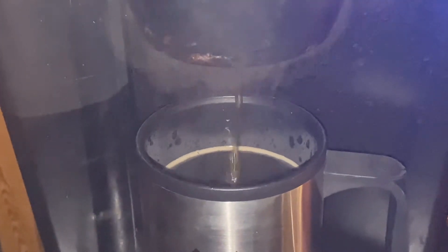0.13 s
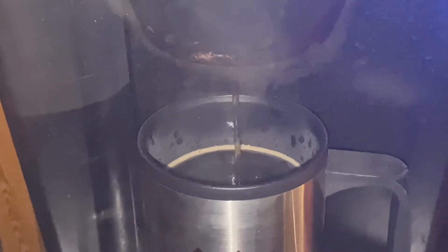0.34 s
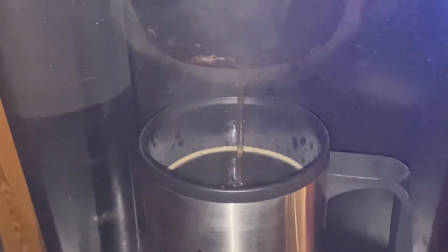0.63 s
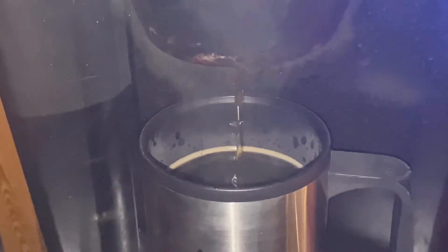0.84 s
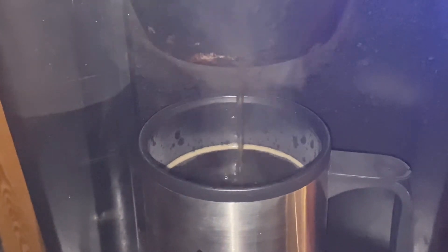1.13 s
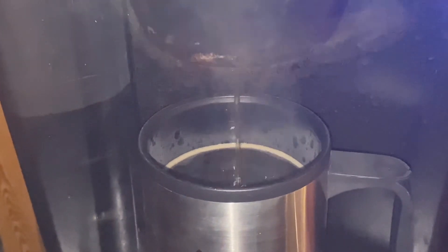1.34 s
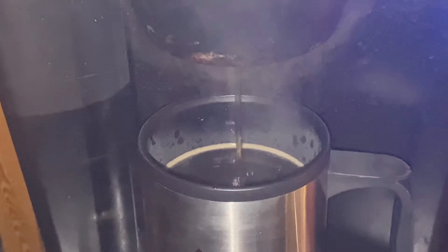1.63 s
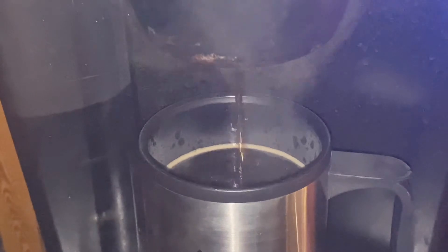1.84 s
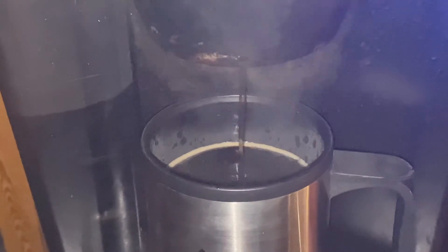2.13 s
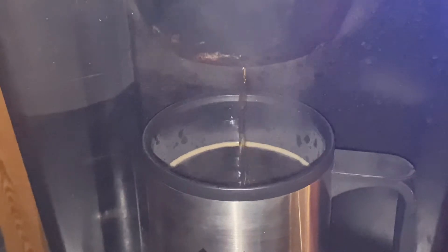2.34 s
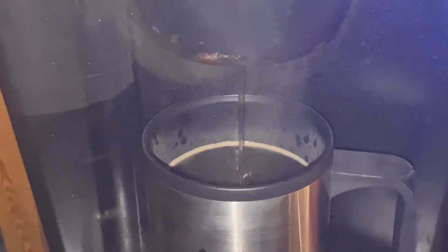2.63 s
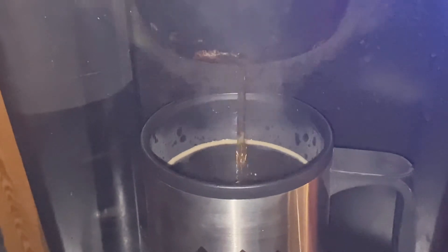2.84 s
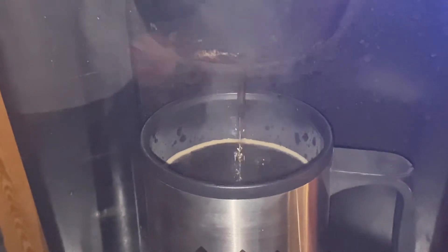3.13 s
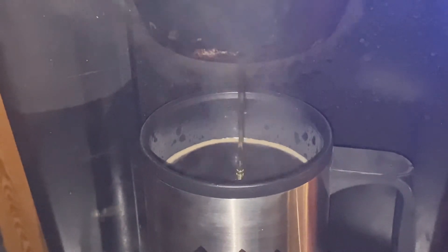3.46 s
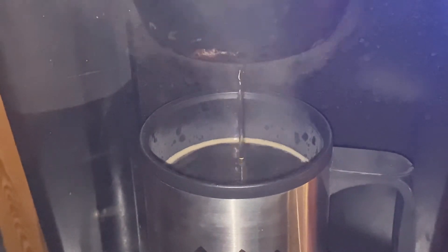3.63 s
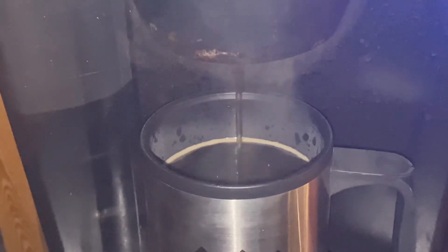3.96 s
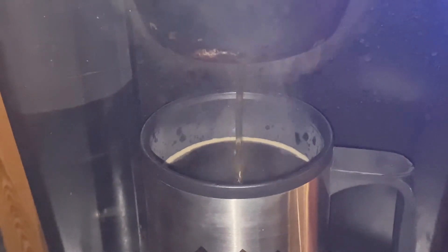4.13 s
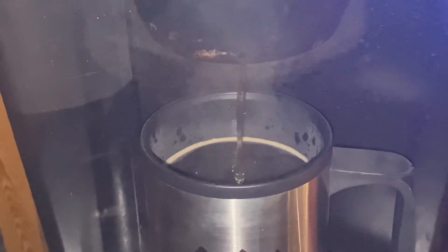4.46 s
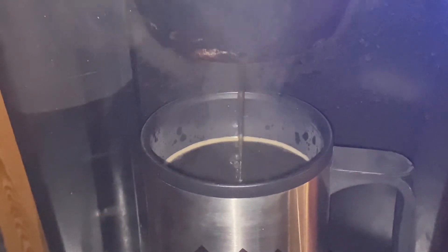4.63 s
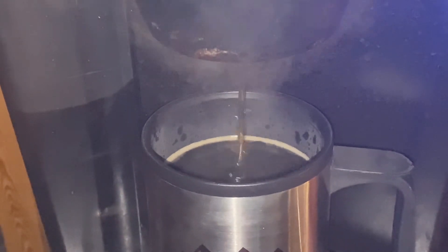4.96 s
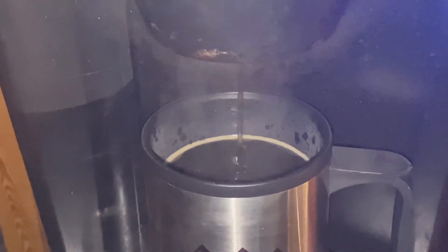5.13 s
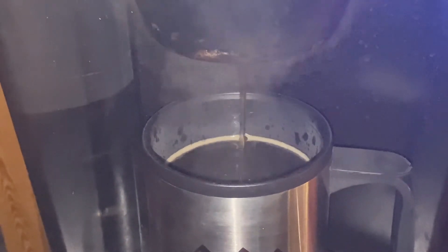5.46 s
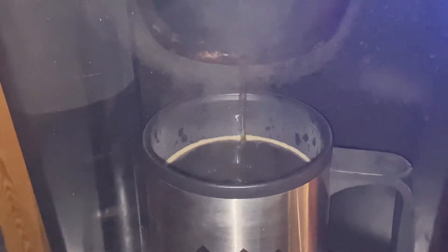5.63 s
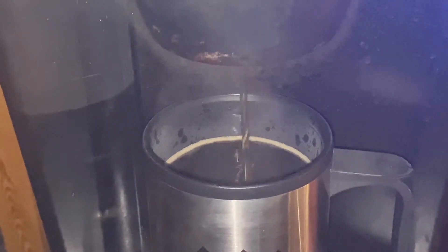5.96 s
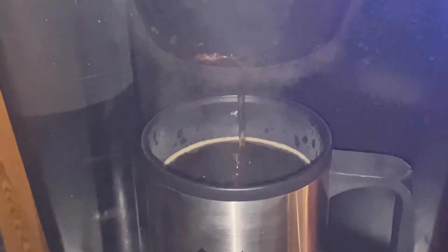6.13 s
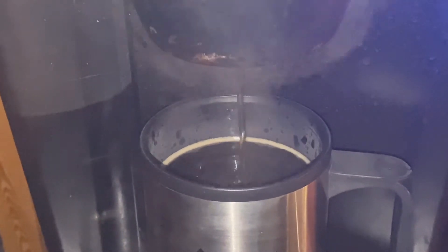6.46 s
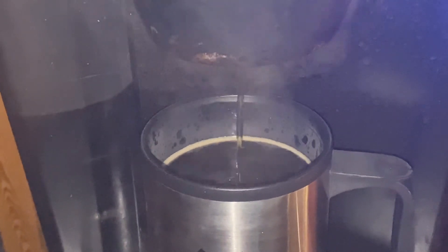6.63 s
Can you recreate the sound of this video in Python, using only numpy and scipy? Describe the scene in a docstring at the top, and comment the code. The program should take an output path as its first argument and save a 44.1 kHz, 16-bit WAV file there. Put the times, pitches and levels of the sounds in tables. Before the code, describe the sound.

Close-up coffee maker trickle: irregular bubbly drips ring inside a metal mug while a pump hums in five short bursts above a low room drone.

```python
"""Coffee trickles from a brewer into a steel mug standing in its alcove, over a low room rumble.
From the start falling drops tick on the surface and trap bubbles, which sound as damped sines;
they drive the air of mug and alcove, a bank of resonances strongest near 1 kHz.
About half a second in, the pump starts the first of five bursts: shaft orders and a whirr, with clunks.
Two close microphone ports hear it with different phase and level."""
import sys
import numpy as np
from scipy import signal
from scipy.fft import rfft, irfft, next_fast_len
from scipy.io import wavfile
from scipy.ndimage import uniform_filter1d, map_coordinates

SR = 44100
rng = np.random.default_rng(int(sys.argv[2]) if len(sys.argv) > 2 else 0)


def unload_wav(signal):
    """Save mono or channel-first audio to the path in sys.argv[1] as 16-bit WAV at rate SR, clipped to [-1, 1]."""
    wavfile.write(
        sys.argv[1],
        SR,
        np.round(np.clip(np.atleast_2d(signal).T, -1, 1) * 32767).astype(np.int16),
    )


N = 299880

# room rumble: pitch_hz, relative density_db (per Hz)
RUMBLE_SPECTRUM = [(25, -25.5), (45, -2), (57, -6), (72, 5.5), (86, -9), (100, 1), (122, -14), (180, -14.5),
                   (310, -24.5), (900, -38), (2000, -81)]
# air resonances of the mug: pitch_hz (sways by HOLLOW_SWAY), width_hz, relative level_db
HOLLOW_MODES = [(951.7, 53.4, 8.5), (1029.7, 19.2, 8), (1122.5, 29.4, 8.5), (1322, 72, 2.5)]
# air resonances of the alcove: pitch_hz, width_hz, relative level_db
ALCOVE_MODES = [(1700, 630, -8.5), (2340, 129, 3), (2650, 210, 0), (3540, 276, 5.5), (5333, 238, -2),
                (6076, 225, 5.5), (8090, 252, 2), (8570, 240, 5.5), (9760, 130, -0.5), (10240, 100, 3.5),
                (10930, 470, 5), (11940, 270, 9.5), (14160, 2100, 4.5)]
# plinks of falling drops, one main pitch each: start_s, relative level_db, pitch_hz
PLINKS = [(0.002, -38, 1050), (0.01, -35, 1430), (0.056, -44.5, 3240), (0.249, -49, 3300),
          (0.293, -48.5, 3300), (0.386, -36.5, 6460), (0.337, -46, 1120), (0.47, -40.5, 1155),
          (0.738, -44, 1110), (0.792, -40, 954), (0.893, -42, 2250), (0.923, -38.5, 3200),
          (0.924, -44, 5130), (0.962, -38.5, 2840), (0.996, -42, 1156), (1.065, -40, 947),
          (1.215, -41.5, 3100), (1.237, -33, 1970), (1.268, -46, 3400), (1.362, -37, 1400),
          (1.412, -45, 1030), (1.69, -44.5, 1650), (1.87, -48, 1170), (1.931, -41.5, 1110),
          (2.273, -47.5, 1080), (2.338, -42, 745), (2.404, -43.5, 677), (2.475, -43, 970),
          (2.506, -45.5, 8100), (2.562, -44.5, 980), (2.626, -45.5, 970), (2.709, -44.5, 930),
          (2.751, -46, 1070), (2.807, -47, 2650), (2.87, -45.5, 3480), (2.899, -42.5, 3970),
          (3.115, -38, 2460), (3.329, -43, 2710), (3.454, -42.5, 1760), (3.491, -40.5, 960),
          (3.671, -40, 3170), (3.791, -40.5, 5860), (3.852, -40, 11200), (4.095, -39, 2800),
          (4.111, -40, 1740), (4.112, -43.5, 14700), (4.228, -39, 1450), (4.291, -39, 1600),
          (4.304, -38.5, 2090), (4.328, -45.5, 3540), (4.35, -38.5, 994), (4.381, -40, 1760),
          (4.393, -41, 3480), (4.432, -37, 3170), (4.662, -48, 2600), (4.822, -44, 980), (4.87, -26, 10300),
          (4.895, -39.5, 970), (4.917, -39, 1740), (4.936, -43.5, 3680), (4.954, -37, 1700),
          (4.983, -46, 990), (4.983, -38, 11600), (5.003, -43, 1040), (5.003, -37.5, 15500),
          (5.025, -45.5, 3520), (5.041, -46, 2970), (5.074, -46, 2690), (5.117, -46, 2660),
          (5.042, -47.5, 960), (5.072, -44.5, 990), (5.139, -46.5, 3550), (5.242, -40, 1140),
          (5.318, -43.5, 5900), (5.325, -49.5, 990), (5.442, -46, 2720), (5.455, -48, 2670),
          (5.463, -38.5, 4160), (5.528, -42.5, 3210), (5.813, -38, 3330), (5.953, -47.5, 1040),
          (6.03, -40, 1640), (6.04, -34.5, 1640), (6.086, -45, 3420), (6.165, -41.5, 2140),
          (6.202, -44, 2610), (6.212, -43, 2630), (6.402, -42, 960), (6.534, -41, 10700),
          (6.592, -42.5, 3470)]
# drops with a plop, a snap and spray, each loud or faint, levels relative: start_s,
# plop_level_db, plop_pitch_hz, snap_level_db, snap_pitch_hz, spray_level_db
COMPOUND_DROPS = [(0.072, -69, 970, -38.5, 2900, -42), (0.113, -29, 1057, -36.5, 1650, -41),
                  (0.186, -40, 1010, -34, 2310, -45), (0.561, -35.5, 1040, -35, 1500, -46.5),
                  (0.811, -38.5, 960, -48, 1850, -47), (1.32, -48.5, 1035, -38, 3200, -59),
                  (1.518, -51, 1040, -39.5, 1700, -43), (1.577, -57, 980, -39, 1520, -43),
                  (1.713, -51, 940, -41, 3700, -39), (1.823, -29.5, 918, -39, 1570, -45.5),
                  (2.187, -52, 1020, -39, 3400, -45), (2.583, -37, 1047, -48, 1830, -38.5),
                  (2.606, -47.5, 920, -33, 1710, -46), (2.877, -58.5, 960, -42, 2340, -43),
                  (2.967, -50.5, 1010, -35, 3300, -38.5), (3.003, -45, 1030, -39.5, 3230, -51),
                  (3.04, -44.5, 1100, -41.5, 2340, -45), (3.209, -50, 1000, -43, 2660, -45),
                  (3.237, -41.5, 987, -44, 1700, -50), (3.276, -46.5, 1060, -39.5, 3770, -37.5),
                  (3.35, -46, 1090, -37, 3200, -37.5), (3.366, -42.5, 1098, -42, 1700, -64),
                  (3.705, -30.5, 978, -37, 1660, -56), (3.852, -40, 1064, -31, 1700, -42.5),
                  (4.14, -42, 1063, -32, 1580, -35.5), (4.206, -36.5, 1060, -35.5, 2220, -60),
                  (4.335, -37, 1010, -50, 1590, -49.5), (4.4, -37.5, 1046, -39.5, 2430, -46.5),
                  (4.514, -38.5, 1000, -37.5, 3250, -73), (4.531, -32, 870, -34, 1470, -46),
                  (4.561, -37, 980, -45.5, 3350, -47), (4.696, -52, 1100, -44, 2800, -46),
                  (4.871, -40, 1040, -32.5, 1520, -61), (5.312, -49.5, 1010, -38, 3330, -64),
                  (5.402, -36.5, 988, -48, 1560, -52.5), (5.52, -43, 1055, -53, 2820, -51),
                  (5.676, -33.5, 955, -35, 2800, -39), (5.781, -31, 926, -44, 1600, -51),
                  (5.863, -36, 880, -39, 1540, -43.5), (6.117, -57, 1040, -37, 1610, -42.5),
                  (6.231, -32, 960, -45, 1710, -45.5), (6.28, -52, 970, -31, 1590, -40),
                  (6.471, -64, 1000, -38.5, 2340, -38.5), (6.534, -36, 1054, -33, 2770, -42),
                  (6.572, -42, 990, -44, 2360, -40.5), (6.755, -35, 952, -34, 1620, -59),
                  (6.797, -39, 1150, -38, 3400, -41.5)]
# pump bursts, before smoothing: start_s, stop_s, relative level_db
PUMP_BURSTS = [(0.465, 1.366, -66.5), (1.8, 2.472, -66.5), (2.98, 3.642, -65.5), (4.147, 5.08, -65.5),
               (5.685, 6.471, -66)]
# harmonics of the shaft: multiple of shaft speed, relative level_db
SHAFT_ORDERS = [(9, -2), (13, -4), (18, -2.5), (27, -6), (28, -5), (33, -5.5)]
# broadband noise of the pump: pitch_hz, relative density_db (per Hz)
WHIRR_SPECTRUM = [(120, -4), (200, 2), (480, -4.5), (620, -1), (1300, -3.5), (2000, -7.5), (3500, -34),
                  (8000, -23.5), (16000, -49)]
# clunks as the pump takes up or drops its load: start_s, relative level_db, pitch_hz
PUMP_CLUNKS = [(0.498, -36.5, 568), (0.521, -48.5, 217), (1.217, -41, 572), (1.27, -43, 241),
               (1.934, -42, 566), (3.01, -42, 599), (4.185, -44.5, 617), (5.003, -42, 601),
               (5.745, -40, 591)]
# noise of the shaking casing: pitch_hz, relative density_db (per Hz)
RATTLE_SPECTRUM = [(200, 2), (1300, -3), (2500, -27), (9000, -45)]
# decay of the room: pitch_hz, t60_s
ROOM_DECAY = [(300, 0.32), (2000, 0.085), (12000, 0.15)]
# phase by which the left port leads the right: pitch_hz, lead_rad
PORT_LEAD = [(20, 0), (860, .6), (1700, -.1), (3300, .6), (5400, .4), (6000, -.7), (7800, 0), (8100, 1.9),
             (9000, 2.1), (10400, .4), (13200, -3), (15500, -5.9)]
# level of the left port over the right: pitch_hz, difference_db
PORT_LEAN = [(60, -2), (380, 0), (700, 4), (950, 6), (1300, 3), (2000, 0), (15000, 0)]

SHAFT_HZ = 20.9  # mean shaft speed
HOLLOW_SWAY = 0.012  # share by which the two tunings of the hollow lie below and above its table
TOP_HZ = 16700  # band limit


def amp(db):
    """Decibel law: amplitude gain of a level in dB."""
    return 10 ** (np.asarray(db) / 20)


def unit(x):
    """Normalization: x at rms 1."""
    return x / np.sqrt(np.mean(x ** 2) + 1e-20)


def along(points, hz):
    """Interpolation of (Hz, value) points on a logarithmic frequency axis."""
    f, v = np.transpose(points)
    return np.interp(np.log(hz + 1), np.log(f + 1), v)


def wobble(rate):
    """Slow random modulation: a smooth curve through `rate` random knots a second."""
    knots = rng.standard_normal(int(N * rate / SR) + 4)
    return map_coordinates(knots, [np.arange(N) * rate / SR])


def filtered(x, response):
    """Linear filtering: the spectrum of x times a complex response of frequency."""
    m = next_fast_len(N + SR // 2)
    return irfft(rfft(x, m) * response(np.fft.rfftfreq(m, 1 / SR)), m)[..., :N]


def noise(spectrum):
    """Spectral shaping: white noise coloured by a density in dB, then set to rms 1."""
    white = rng.standard_normal(N)
    return unit(filtered(white, lambda hz: amp(along(spectrum, hz))))


def resonant(x, modes):
    """Modal superposition: causal second-order resonances in parallel, of alternating sign."""
    def response(f):
        return sum((-1) ** k * amp(db) * 1j * f * width / (hz * hz - f * f + 1j * f * width)
                   for k, (hz, width, db) in enumerate(modes))
    return filtered(x, response)


def pings(s, db, hz, cycles, rise, size):
    """Damped oscillation: sines decay by 1/e in `cycles`; a rise lifts pitch as for bubbles near the surface."""
    turns = np.arange(size) / SR * hz[:, None]
    bent_turns = turns * (1 + rise * np.minimum(turns / cycles, 2))
    wave = np.sin(2 * np.pi * bent_turns) * np.exp(-turns / cycles)
    at = np.round(s * SR).astype(int)[:, None] + np.arange(size)
    return np.bincount(at.ravel(), (amp(db)[:, None] * wave).ravel(), N + size)[:N]


def rumble():
    """Partly coherent field: a low room drone, nearly alike at both ports."""
    common = amp(-58) * noise(RUMBLE_SPECTRUM)
    apart = amp(-75.0) * noise(RUMBLE_SPECTRUM)
    return np.array([common + apart, common - apart])


def wash(load):
    """Resonant filtering of noise: soft wet hiss in mug and alcove swells with the pump."""
    fizz = unit(resonant(rng.standard_normal(N), HOLLOW_MODES))
    fizz = amp(-75.5 + 1.6 * wobble(8.3)) * fizz
    hiss = unit(resonant(rng.standard_normal(N), ALCOVE_MODES))
    hiss = amp(-87.5 + 0.8 * wobble(22)) * hiss
    return amp(6.4 * unit(load)) * (fizz + hiss)


# Each water source below returns three rows: the drives of hollow, alcove and open air.

def beads(s, db, hz):
    """Bubble oscillation: tiny bubbles ring a few cycles with no slap and drive hollow and alcove alike."""
    return np.outer([1, 1, 0], pings(s, db, hz, cycles=3.44, rise=0.043, size=500))


def patter(source, count, top_db, hz, spread):
    """Random arrivals: droplets at uniform times, log-normal in pitch, most fainter than top_db."""
    s, size = rng.random((count, 2)).T
    pitch = np.clip(hz * np.exp(spread * rng.standard_normal(count)), 600, 15000)
    db = top_db + 6 * np.log(size + .04)
    return source(s * (N - 1) / SR, db, pitch)


def trickle(load):
    """Jet breakup: a patter of droplets and tiny bubbles, stronger while the pump pushes."""
    clumps = amp(3.8 * wobble(5.542) + 1.47 * wobble(25))  # the stream breaks up in clumps
    flow = (1.72 + unit(load)) * clumps
    small_drops = (patter(snaps, count=160, top_db=-59.5, hz=2430, spread=0.417)
                   + patter(spits, count=150, top_db=-63.5, hz=9540, spread=0.27)
                   + patter(plops, count=300, top_db=-64.0, hz=1054, spread=0.086))
    burble = patter(beads, count=2600, top_db=-66, hz=2415, spread=0.401)
    return flow * (small_drops + burble)


def plops(s, db, hz):
    """Forced resonance: a large bubble clicks, then drives the hollow for more or fewer cycles."""
    cycles = 1.965 * np.exp(0.29 * rng.standard_normal((len(s), 1)))
    plop = pings(s, db, hz, cycles=cycles, rise=0.015, size=1200)
    click = pings(s, db - 6.5, 1.463 * hz, cycles=2.5, rise=0, size=400)
    return np.array([amp(5.5) * plop, 0 * plop, click])


def snaps(s, db, hz):
    """Impact and entrainment: a drop gives a broad slap and a small chirping bubble, each of its own size."""
    own = rng.standard_normal((len(s), 4))
    slap_db = db + 0.5 + 3.47 * own[:, 0]
    slap_hz = hz * np.exp(0.24 * own[:, 1])
    slap = pings(s, slap_db, slap_hz, cycles=0.66, rise=0, size=200)
    cycles = hz[:, None] * 0.0015 * np.exp(0.39 * own[:, 2:3])  # decay near 1.5 ms at any pitch
    bubble = pings(s, db - 5, hz, cycles=cycles, rise=0.0724 * np.abs(own[:, 3:]), size=500)
    return amp([[0], [3.5], [-9]]) * (slap + bubble)


def spits(s, db, hz, count=5):
    """Secondary breakup: a tick, then a few tiny bubbles of related pitch within some milliseconds."""
    tick_db = db + 4 * rng.standard_normal(len(s))
    tick = pings(s, tick_db, 0 * s + 10000, cycles=0.35, rise=0, size=24)
    late = rng.random((len(s), count)) ** 2 * np.arange(count) / count  # the first has no delay
    detune = np.exp(0.31 * rng.standard_normal(late.shape) * (late > 0))
    pitch = np.clip(hz[:, None] * detune, 3000, 16000)
    level_db = db[:, None] + 2.5 - 22 * late - 5 * (late > 0)
    start_s = np.minimum(s[:, None] + .008 * late, N / SR)
    spray = pings(start_s.ravel(), level_db.ravel(), pitch.ravel(), cycles=2.5, rise=0.021, size=160)
    return amp(3.0) * np.outer([0, 1, 0], tick + spray)


def plinks():
    """Size sets pitch: the main pitch decides whether a plink gulps, plops, snaps or spits; each adds spray."""
    rows = np.array(PLINKS)
    s, db, hz = rows.T
    kind = np.digitize(hz, [850, 1300, 5000])
    own = rng.standard_normal((len(rows), 2))
    spray = spits(s, db - 22 + 5 * own[:, 0], 8000 * np.exp(0.29 * own[:, 1]))
    main = sum(source(*rows[kind == k].T) for k, source in enumerate([gulps, plops, snaps, spits]))
    return spray + main


def compound_drops():
    """Superposition: each drop sums a plop, a snap and spray, each loud or faint."""
    s, plop_db, plop_hz, snap_db, snap_hz, spray_db = np.transpose(COMPOUND_DROPS)
    spray_hz = 6400 * np.exp(0.19 * rng.standard_normal(len(s)))
    return snaps(s, snap_db, snap_hz) + spits(s, spray_db, spray_hz) + plops(s, plop_db, plop_hz)


def air(hollow, alcove, direct):
    """Cavity resonance: steam and the heaving surface shift the hollow between a lower and a higher tuning."""
    turn = np.pi / 4 * (1 + np.tanh(wobble(6.1)))  # equal-power crossfade
    low, high = [[(hz * shift, width, db) for hz, width, db in HOLLOW_MODES]
                 for shift in (1 - HOLLOW_SWAY, 1 + HOLLOW_SWAY)]
    mug = resonant(np.cos(turn) * hollow, low) + resonant(np.sin(turn) * hollow, high)
    return mug + resonant(alcove, ALCOVE_MODES) + direct


def kitchen(x):
    """Diffuse reverberation: the room answers after 200 samples, each frequency dying at its own speed."""
    hz, t, z = signal.stft(rng.standard_normal((2, SR // 3)), SR, nperseg=256)
    decay = amp(-60 * t / along(ROOM_DECAY, hz)[:, None])
    tail = signal.istft(z * decay, SR, nperseg=256)[1]
    tail = tail / np.linalg.norm(tail[0])
    return signal.fftconvolve(np.pad(x, (200, 0))[None], tail, axes=1)[:, :N]


def duty():
    """Inertia: the gain of the pump in time, with spin-up and run-down of about 50 ms."""
    t = np.arange(N) / SR
    running = sum(amp(db) * (t > start) * (t < stop) for start, stop, db in PUMP_BURSTS)
    return np.abs(uniform_filter1d(running, size=2200))


def pump(load):
    """Rotating machinery: shaft orders over a whirr while the motor runs, with clunks and casing rattle."""
    shaft = 2 * np.pi * np.cumsum(SHAFT_HZ * (1 + 0.0019 * wobble(2.675))) / SR
    tones = sum(amp(db + 3.8 * wobble(12)) * np.sin(round(k) * shaft + 2 * np.pi * rng.random())
                for k, db in SHAFT_ORDERS)
    s, db, hz = np.transpose(PUMP_CLUNKS)
    knocks = (pings(s, db - 12.5, hz, cycles=13.0, rise=0, size=2000)
              + pings(s, db - 9.0, 2.1 * hz, cycles=11.0, rise=0, size=2000))
    shake = pings(s, db - 0.5, 0 * s + 12, cycles=0.13, rise=0, size=3000)  # a short pulse as envelope
    rattle = shake * noise(RATTLE_SPECTRUM)
    flutter_db = 1.5 * wobble(15)
    whirr = amp(1.0 + flutter_db) * noise(WHIRR_SPECTRUM)
    return load * (amp(-2) * unit(tones) + whirr) + knocks + rattle


def gulps(s, db, hz):
    """Surface proximity: a deep bubble's pitch climbs towards that of the hollow."""
    gulp = pings(s, db, hz, cycles=4.0, rise=0.09, size=1500)
    return np.outer([1, 0, 1], gulp)


def scene():
    """Two-point reception: all sounds reach the ports with different phase and level."""
    load = duty()
    water = air(*compound_drops() + plinks() + trickle(load)) + wash(load)
    # small sources radiate little bass
    splashes = filtered(water, lambda hz: (1j * hz / (620 + 1j * hz)) ** 2)
    near = amp(2.0) * splashes + pump(load)
    side = np.array([[.5], [-.5]])  # left, right: half of each difference

    def ports(hz):
        return amp(side * along(PORT_LEAN, hz)) * np.exp(1j * side * along(PORT_LEAD, hz))
    return filtered(near + rumble() + amp(-14.5) * kitchen(near), ports)


def record(dry):
    """Band limiting: the microphones fade by 9 dB above 15.2 kHz, and nothing passes TOP_HZ."""
    return filtered(dry, lambda hz: amp(-9 * np.clip((hz - 15200) / 1200, 0, 1)) * (hz < TOP_HZ))


dry = scene()
out = record(dry)
unload_wav(out)
```